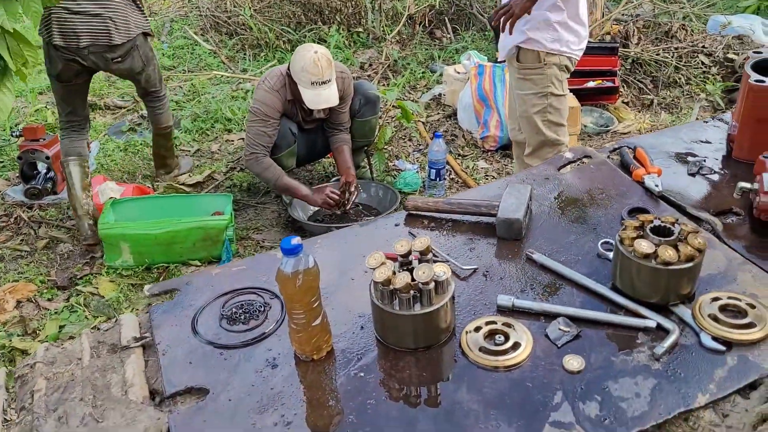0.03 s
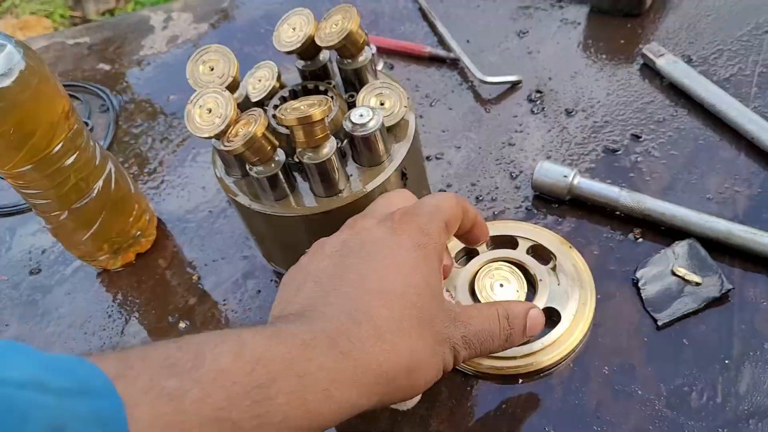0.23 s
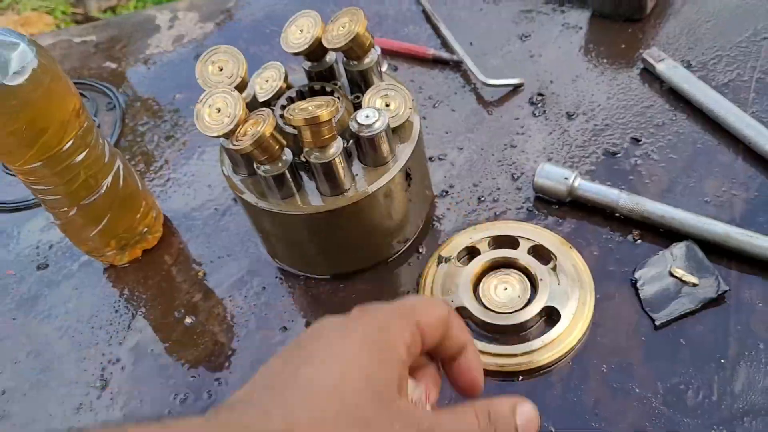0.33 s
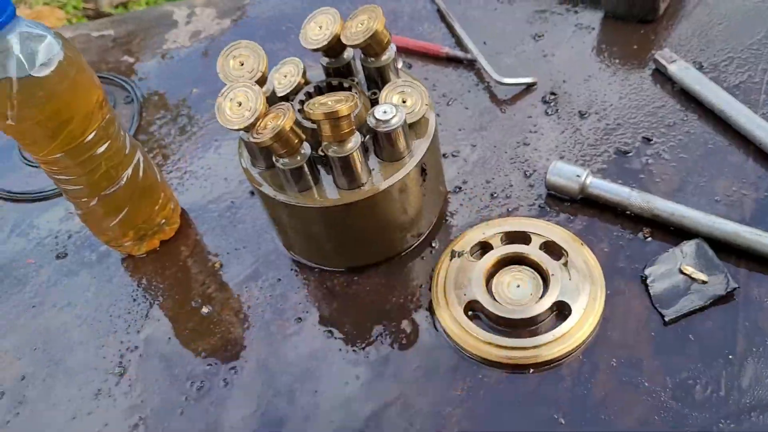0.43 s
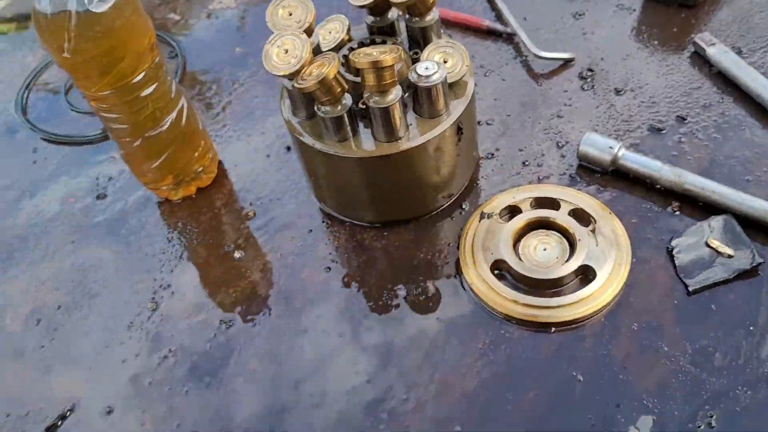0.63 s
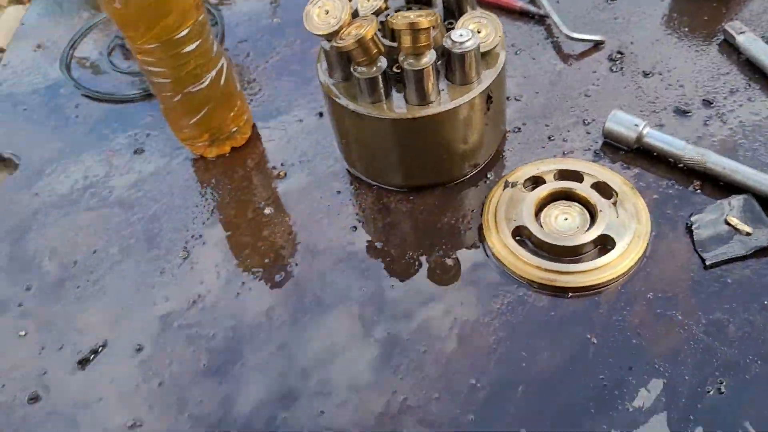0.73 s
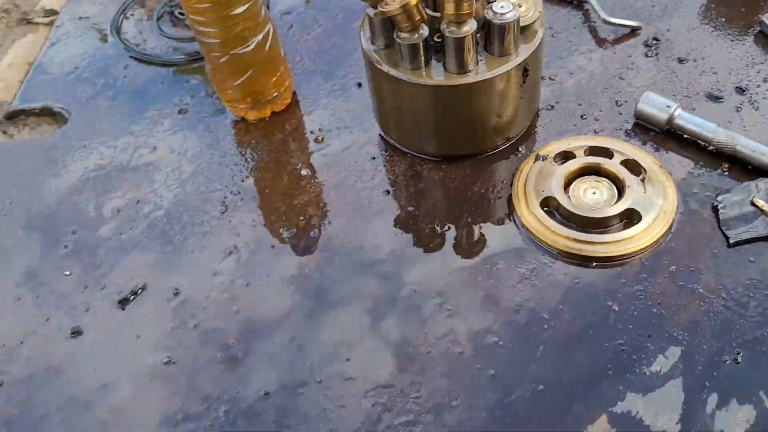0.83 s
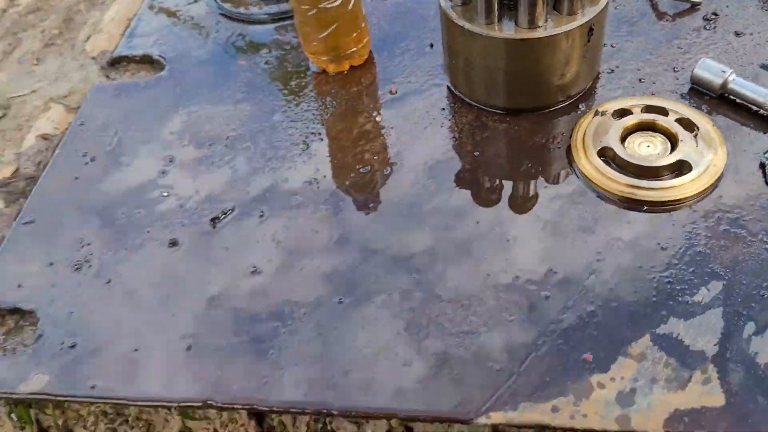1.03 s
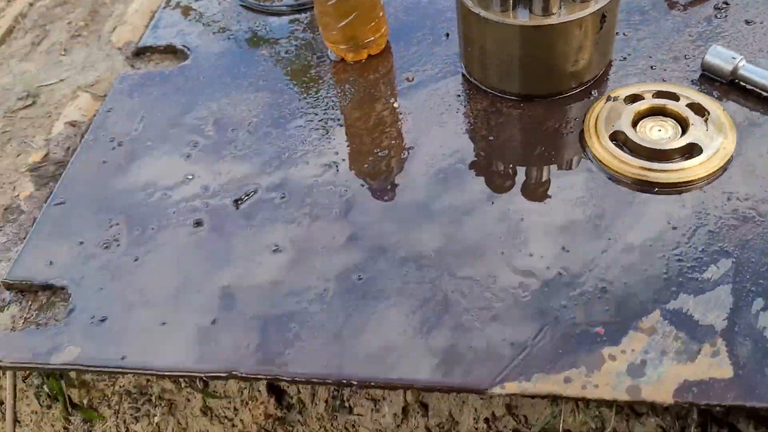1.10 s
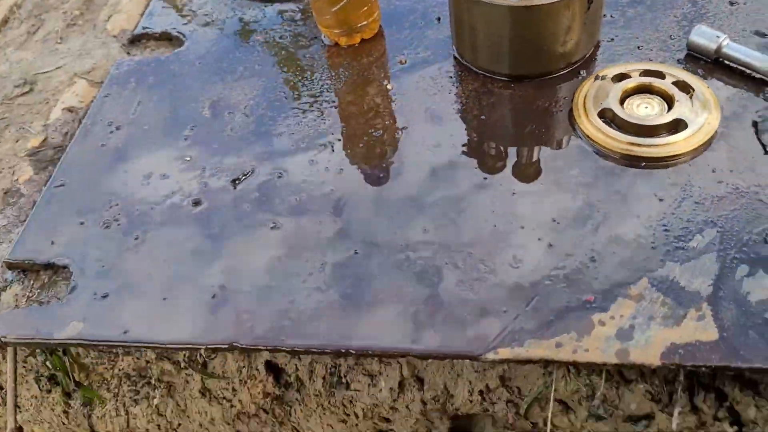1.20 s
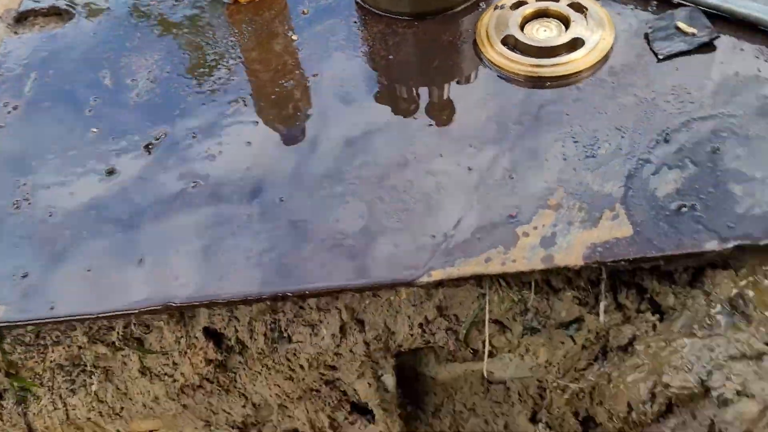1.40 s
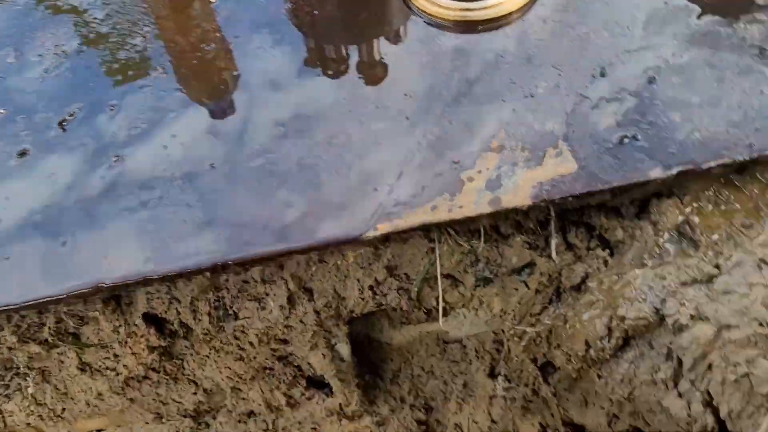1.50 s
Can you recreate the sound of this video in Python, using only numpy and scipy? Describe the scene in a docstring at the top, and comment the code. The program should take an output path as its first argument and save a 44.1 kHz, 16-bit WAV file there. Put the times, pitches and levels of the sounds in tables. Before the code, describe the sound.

A few sharp, bright clacks of a brass part set down on a steel sheet outdoors.

```python
"""Faint outdoor air and ticks of grit, a brief silence, then bright metal clacks up close.
A brass valve plate is set down on a wet steel sheet lying on soil and rocks from edge to edge.
Each of its double clacks rings the damped sheet and a very high, beating pair of modes in the brass.
Air buffets the left microphone port as the hand withdraws. Soft hiss and rustle swell and fade,
with two far-off whistles barely showing through."""
import sys
import numpy as np
from scipy import signal
from scipy.fft import rfft, irfft
from scipy.io import wavfile
from scipy.ndimage import uniform_filter1d, minimum_filter1d

SR = 44100
rng = np.random.default_rng(int(sys.argv[2]) if len(sys.argv) > 2 else 0)


def master_out(mix):
    """Clip the mix to full scale and print it as 16-bit PCM to the path in sys.argv[1]."""
    frames = np.transpose(np.atleast_2d(mix))
    ceiling = np.clip(frames, -1, 1)
    pcm = np.round(ceiling * 32767).astype(np.int16)
    wavfile.write(sys.argv[1], SR, pcm)


N = 68355
TIME = np.arange(N) / SR
HIT_SAMPLES = 12000  # room for one clack or tick to ring out
PORTS_ALIKE_HZ = 1200  # the stereo image narrows below this

# Hits of the plate's edges on the sheet; modes_db is relative to clack_db:
# start_s, clack_db, tilt_db_per_octave, modes_db, brass_db, brass_pan_db
CONTACTS = [(0.2367, -17, 6.5, -19.5, -8.5, 13), (0.2445, -11, -0.35, -23, -1.84, 1),
            (0.2951, -18, 0.1, -20.5, -11.5, -0.5), (0.3042, -26.5, 5.5, -9, -21.5, -1),
            (0.3248, -17.5, 1.3, -18.5, -16.5, 12), (0.3338, -25.5, -4, -18, -20, -6),
            (0.3419, -29.5, 6, -29, -31.5, -1), (0.3858, -19.5, 1.4, -23, -29, 12),
            (0.3942, -19.5, 2.4, -22.5, -27.5, -8), (0.4318, -33.5, -5.5, -17.5, -41, 19),
            (0.4442, -44.5, -11, -20, -41, 15)]


def undb(db):
    """Decibels to gain."""
    return 10 ** (np.asarray(db) / 20)


def pan(db):
    """Stereo gains for a left-minus-right level difference."""
    return undb(np.array([[db], [-db]]) / 2)


def since(start):
    """Seconds since a moment, zero before it."""
    return np.maximum(TIME - start, 0)


def fade(age, t60):
    """Exponential decay, 60 dB down after t60 seconds."""
    return np.exp(-np.log(1000) * age / t60)


def fader(points):
    """Gain riding through (time_s, level_db) points."""
    return undb(np.interp(TIME, *np.array(points).T))


def colour(noise, spectrum, tilt_db=0, tilt_from_hz=440):
    """Shape white noise at constant power, tilting it by tilt_db per octave above the bass."""
    size = noise.shape[-1]
    freq = np.maximum(np.fft.rfftfreq(size, 1 / SR), 1)
    hz, db = np.array(spectrum).T
    octaves = np.log2(np.maximum(freq / tilt_from_hz, 1))
    gain = undb(np.interp(np.log(freq), np.log(hz), db) + tilt_db * octaves)
    return irfft(rfft(noise) * gain / np.sqrt(np.mean(gain ** 2)), size)


def port_noise(size=N):
    """White noise at two microphone ports: alike in the bass, unrelated in the treble."""
    alike = 1 / (1 + (np.fft.rfftfreq(size, 1 / SR) / PORTS_ALIKE_HZ) ** 2) ** 2
    mid, side = rfft(rng.standard_normal((2, size)))
    mid *= np.sqrt((1 + alike) / 2)
    side *= np.sqrt((1 - alike) / 2)
    return irfft(np.array([mid + side, mid - side]), size)


def place(sound, start):
    """Lay a stereo sound on the timeline at its start time."""
    lead = int(start * SR)
    return np.pad(sound, ((0, 0), (lead, max(N - lead - sound.shape[1], 0))))[:, :N]


def flicker(rate_hz, depth_db):
    """A gain that wavers quickly and at random."""
    size = int(SR / rate_hz)
    steps = np.repeat(rng.standard_normal(N // size + 1), size)[:N]
    return undb(depth_db * uniform_filter1d(steps, size))


def opening_air(level_db=-51.5):
    """Outdoor air with a band of hiss near 2 kHz, leaning right."""
    # Tone of the air: freq_hz, density_db
    spectrum = [(25, 8.5), (50, 7), (110, 4.5), (180, -5), (300, 2.5), (700, -7), (1400, -8), (1900, 6.5),
                (2400, 5.5), (3100, -6), (4500, -7), (8800, -12), (10300, -3.5), (11500, -10.5),
                (15500, -15), (16300, -32.5)]
    return undb(level_db) * pan(-4.5) * colour(port_noise(), spectrum) * flicker(rate_hz=27, depth_db=0.9)


def grit_ticks(t60_s=0.027):
    """Grit and handling make tiny noise bursts, each ringing in its own band."""
    # Ticks: start_s, level_db, centre_hz, half_width_octaves, pan_db
    ticks = [(0.084, -37, 2095, 0.13, -13.5), (0.086, -43.5, 1170, 0.21, 3), (0.106, -41.5, 1750, 0.87, -7),
             (0.160, -44, 11300, 0.42, 4), (0.752, -52, 3300, 0.17, -5), (1.1213, -47, 11650, 0.4, 1),
             (1.134, -58, 3400, 0.94, -3), (1.155, -55.5, 3550, 0.34, 4.5)]
    out, age = 0, TIME[:HIT_SAMPLES]
    for start, db, hz, octaves, pan_db in ticks:
        edges = np.minimum(hz * 2. ** np.array([-octaves, octaves]), SR / 2 - 1)
        band = signal.butter(2, edges, "bandpass", fs=SR, output="sos")
        makeup = np.sqrt(SR / 2 / np.ptp(edges))
        tick = signal.sosfilt(band, port_noise(HIT_SAMPLES) * fade(age, t60_s)) * makeup
        out += undb(db) * pan(pan_db) * place(tick, start)
    return out


def air_puffs():
    """Moving air pushes on one port for a few slow swings: a soft, low bump."""
    # Puffs: centre_s, level_db, width_s, pitch_hz, port (0 left, 1 right)
    puffs = [(0.121, -43, 0.012, 49.5, 1), (0.278, -25.5, 0.0055, 125, 0), (0.296, -30, .014, 59, 0),
             (0.384, -39, 0.032, 54.24, 0), (0.462, -35, 0.017, 72, 0), (0.531, -49, 0.028, 48, 0),
             (0.607, -49.5, 0.015, 51, 0), (0.247, -45.5, 0.0058, 74.6, 0), (0.811, -58.5, 0.026, 51.5, 1),
             (1.199, -60, .035, 44.6, 1), (1.2, -60, 0.03, 45.3, 0)]
    out = np.zeros((2, N))
    for centre, db, width, hz, port in puffs:
        t = TIME - centre
        swell = np.exp(-(t / width) ** 2 / 2)
        out[port] += undb(db) * swell * np.sin(2 * np.pi * hz * t + rng.uniform(0, 2 * np.pi))
    return out


def outdoor_bed(rumble_db=-72.5):
    """Treble hiss, midrange rustle and low outdoor noise swell and fade over a steady rumble."""
    # Tone of each layer: freq_hz, density_db
    hiss_tone = [(900, -34.5), (1500, -22.5), (3500, -6.5), (5000, -0.5), (7000, 1.5), (8700, -4),
                 (10200, 4.5), (12500, 3), (15500, -2), (16300, -22)]
    rustle_tone = [(600, -29.5), (950, -13.5), (1250, -4.5), (1700, -1.5), (2400, -0.5), (3300, -2.5),
                   (4500, -7), (8000, -16)]
    low_tone = [(100, 1.5), (190, -9.5), (270, 3), (340, -3.5), (520, -3.5), (850, -12.5), (1400, -8.5),
                (3000, -23.5)]
    rumble_tone = [(15, -21.5), (30, -8), (50, -0.5), (75, -1), (120, -6.5), (200, -26.5), (500, -45)]
    # Swells of the moving layers: time_s, level_db
    hiss_swells = [(.235, -46.5), (.42, -56), (.48, -47), (.53, -54), (.6, -51.5), (.645, -63), (.7, -56.5),
                   (.75, -62), (.8, -68), (.875, -57.5), (.95, -69), (1.03, -57), (1.1, -65.5),
                   (1.16, -56.5), (1.22, -64), (1.4, -65.5), (1.47, -55), (1.55, -66)]
    rustle_swells = [(.235, -56.5), (.48, -47), (.53, -54.5), (.61, -52.5), (.64, -64), (.75, -60.5),
                     (.79, -72), (.95, -74.5), (1.11, -72.5), (1.16, -63.5), (1.22, -73), (1.39, -77.5),
                     (1.48, -62.5), (1.55, -75)]
    low_swells = [(.235, -80), (.47, -51.5), (.53, -62.5), (.62, -64), (.7, -74), (.95, -76.5),
                  (1.16, -74.5), (1.39, -78), (1.49, -62), (1.55, -66)]
    hiss = colour(port_noise(), hiss_tone) * fader(hiss_swells) * pan(-1.5)
    hiss *= flicker(rate_hz=60, depth_db=1.5)
    rustle = colour(port_noise(), rustle_tone) * fader(rustle_swells) * pan(-7)
    rustle *= flicker(rate_hz=180, depth_db=2.0)
    low = colour(port_noise(), low_tone) * fader(low_swells)
    rumble = undb(rumble_db) * colour(port_noise(), rumble_tone)
    return hiss + rustle + low + rumble


def sheet_clacks(common_share=0.6):
    """Each hit sets off the steel's dense modes, quickly damped by the soil, and a few longer ones."""
    # Tone of the dense, short-lived modes: freq_hz, density_db
    sheet_tone = [(40, -23.5), (120, -26.5), (280, -27.5), (360, -5.5), (650, -6), (770, -7.5), (970, -3.5),
                  (1300, -4), (2100, 1.5), (2800, 2), (3500, -7), (4200, -8), (4750, 0.5), (6000, -2),
                  (7200, -2.5), (8800, -10), (10500, -12), (13200, -9), (14300, 2.5), (15600, -17),
                  (16300, -30.5)]
    # Modes that stand out: pitch_hz, level_db, t60_s, pan_db
    sheet_modes = [(438.4, -7, .2, 3.5), (573, -2.5, 0.066, 4), (683, -9, 0.09, 10),
                   (963, -1.5, 0.095, -3.5), (1599, -3.5, 0.072, 2), (1850, -5.5, 0.109, 0),
                   (2260, -1, 0.056, -1), (2336, -3, 0.11, -0.5), (2732, -2, 0.045, -1),
                   (2768, -1, 0.083, -4), (2916, 0.5, 0.078, -9), (3436, -7, .07, 9.5),
                   (4596, 0.5, 0.087, 0), (5536, -4.5, 0.08, -7)]
    # Snap, body and tail, the brightest dying first: level_db, hold_s, t60_s, tilt_db_per_octave
    stages = [(-10, 0, 0.0081, 7), (-4.5, 0.0014, .036, -0.33), (-21.5, 0.0041, 0.094, -7.5)]
    out, age = 0, TIME[:HIT_SAMPLES]
    common = np.sqrt(common_share) * port_noise(HIT_SAMPLES)  # gives all hits a family likeness
    hz, mode_db, mode_t60, pan_db = np.array(sheet_modes).T
    modes = np.exp(2j * np.pi * hz[:, None] * age) * fade(age, mode_t60[:, None])
    port_gains = undb(mode_db + np.array([pan_db, -pan_db]) / 2)
    phase_spread = np.minimum((hz / PORTS_ALIKE_HZ) ** 2, np.pi)  # higher modes sound wider
    port_gains = port_gains * np.exp(1j * rng.uniform(-1, 1, port_gains.shape) * phase_spread)
    for start, db, tilt_db, modes_db, _, _ in CONTACTS:
        noise = common + np.sqrt(1 - common_share) * port_noise(HIT_SAMPLES)
        strike_phases = np.exp(2j * np.pi * rng.random(len(hz)))
        clack = undb(modes_db) * ((port_gains * strike_phases) @ modes).imag
        for stage_db, hold, t60, stage_tilt_db in stages:
            envelope = fade(np.maximum(age - hold, 0), t60)
            clack += undb(stage_db) * colour(noise, sheet_tone, tilt_db + stage_tilt_db) * envelope
        out += undb(db) * place(clack, start)
    return out


def brass_ring(pitches_hz=(14236, 14263), rise_s=0.0013, choke_s=0.015):
    """Two close modes beat; each hit replaces the ring with a new one, and lying flat chokes it."""
    # The plate's two modes, a negative gain flipping polarity: t60_s, left_gain, right_gain
    brass_modes = [(0.37, -.75, .05), (.2, 1.25, .55)]
    out, ring = 0, 0
    for hz, (t60, left, right) in zip(pitches_hz, brass_modes):
        ring += np.array([[left], [right]]) * np.sin(2 * np.pi * hz * TIME) * fade(TIME, t60)
    for start, _, _, _, db, pan_db in CONTACTS:
        fade_out = np.exp(-since(start) / rise_s)
        out = out * fade_out + (1 - fade_out) * undb(db) * pan(pan_db) * place(ring, start)
    lies_flat_s = CONTACTS[-1][0]
    return out * np.exp(-since(lies_flat_s) / choke_s)


def far_calls():
    """Short, distant whistles, barely above the outdoor bed."""
    # Whistled calls: centre_s, level_db, width_s, pitch_hz
    calls = [(0.856, -68.5, 0.021, 3130), (1.385, -74, 0.019, 1574)]
    out = 0
    for centre, db, width, hz in calls:
        waver = 0.012 * np.log(flicker(rate_hz=140, depth_db=9))  # about 1% in pitch
        swell = np.exp(-((TIME - centre) / width) ** 2 / 2)
        out += undb(db) * swell * np.sin(2 * np.pi * np.cumsum(hz * (1 + waver)) / SR)
    return out


def scene(silence_from_s=0.21, silence_to_s=0.235):
    """The opening air cuts out; after a brief silence the plate is set down."""
    ambience = opening_air() * (TIME < silence_from_s)
    ambience += outdoor_bed() * (TIME > silence_to_s) + far_calls()
    return ambience + sheet_clacks() + brass_ring() + grit_ticks() + air_puffs()


def record(dry, ceiling=0.96, limiter_s=0.002, top_hz=16200):
    """A fast limiter holds the loudest peaks, then a steep low-pass trims the very top."""
    window = int(limiter_s * SR)
    peak = np.maximum(np.abs(dry).max(axis=0), ceiling)
    gain = uniform_filter1d(minimum_filter1d(ceiling / peak, window), window)
    lowpass = signal.ellip(8, .2, 70, top_hz, fs=SR, output="sos")
    return signal.sosfilt(lowpass, dry * gain)


dry = scene()
out = record(dry)
master_out(out)
```